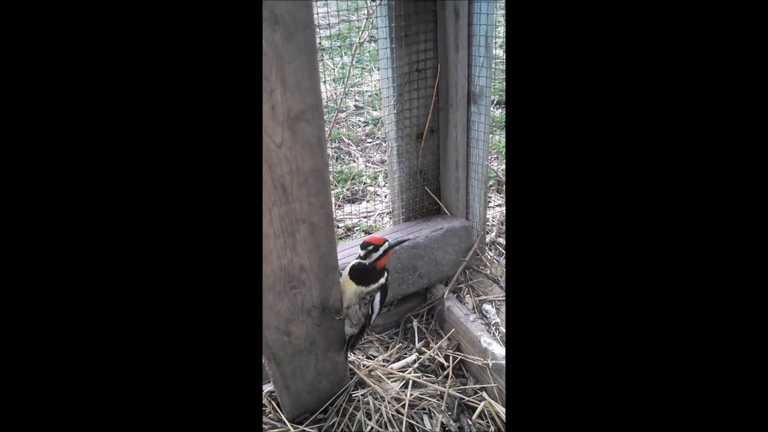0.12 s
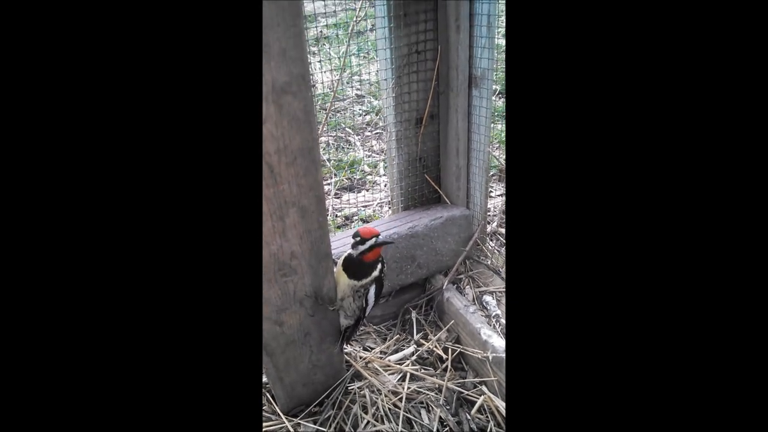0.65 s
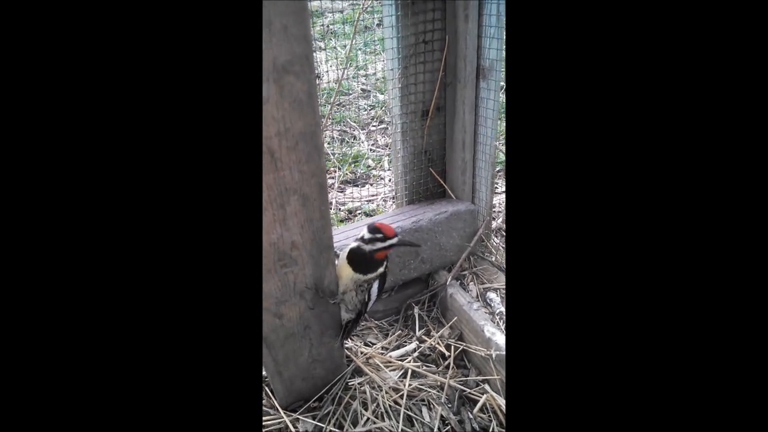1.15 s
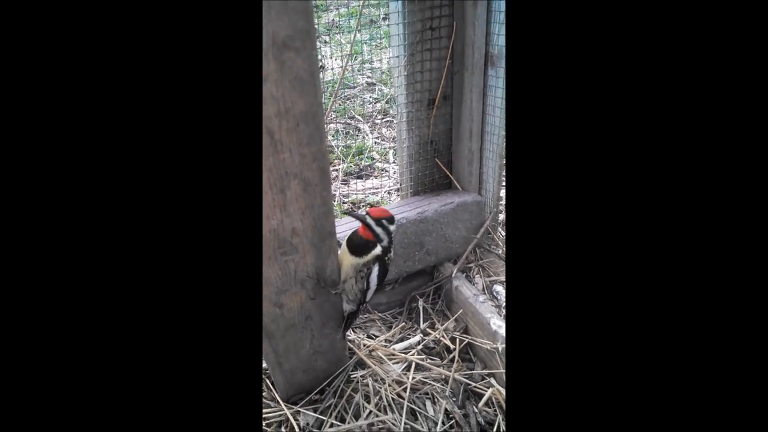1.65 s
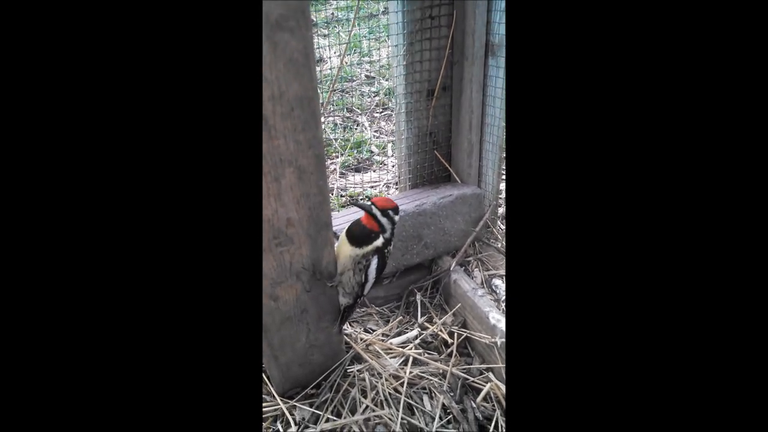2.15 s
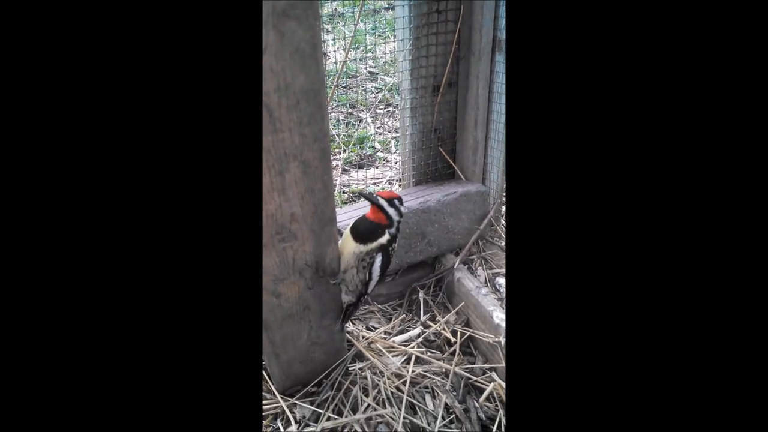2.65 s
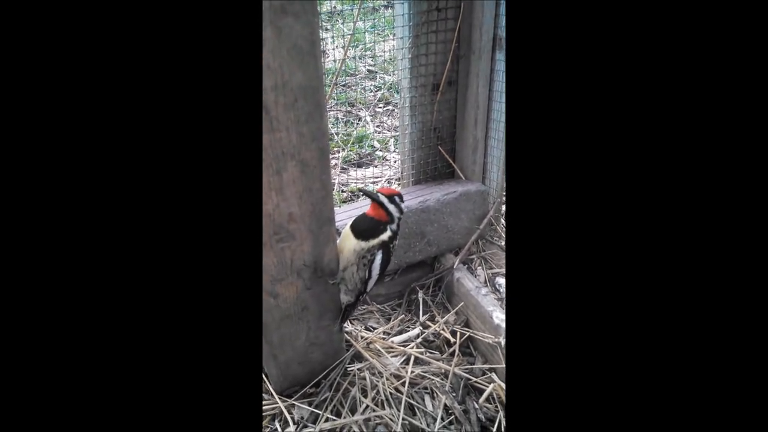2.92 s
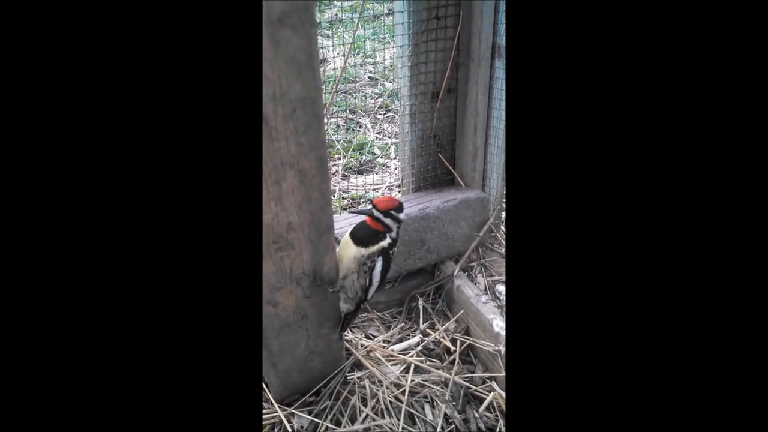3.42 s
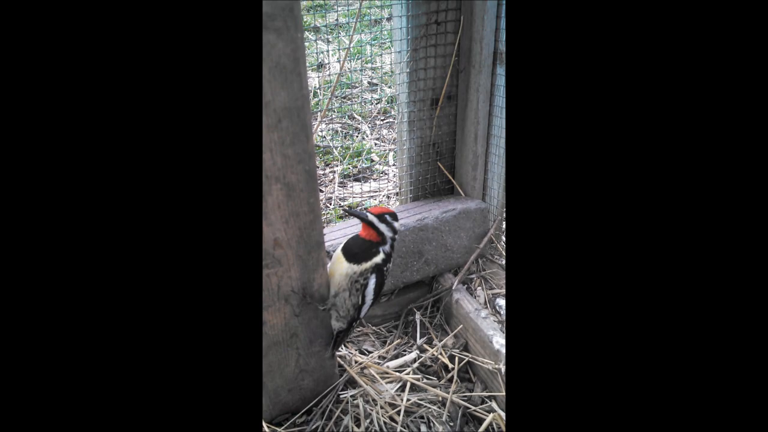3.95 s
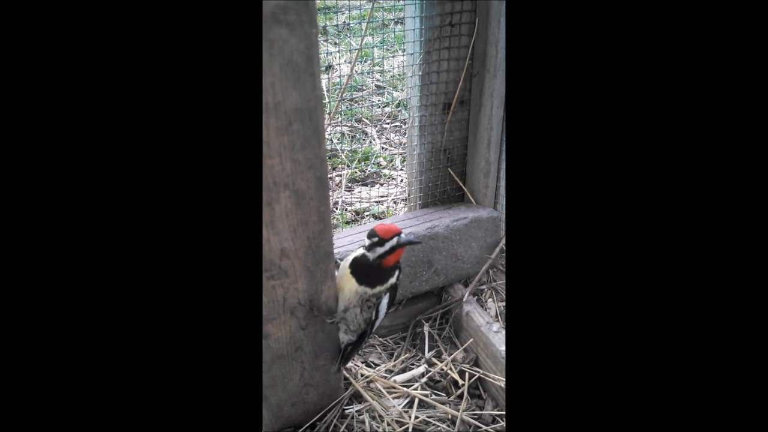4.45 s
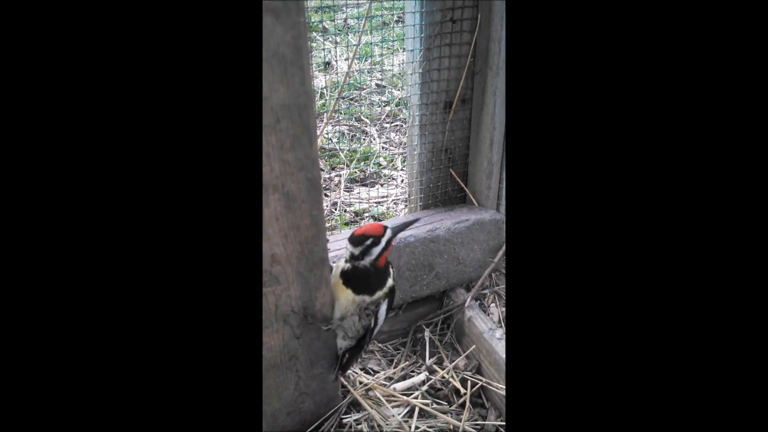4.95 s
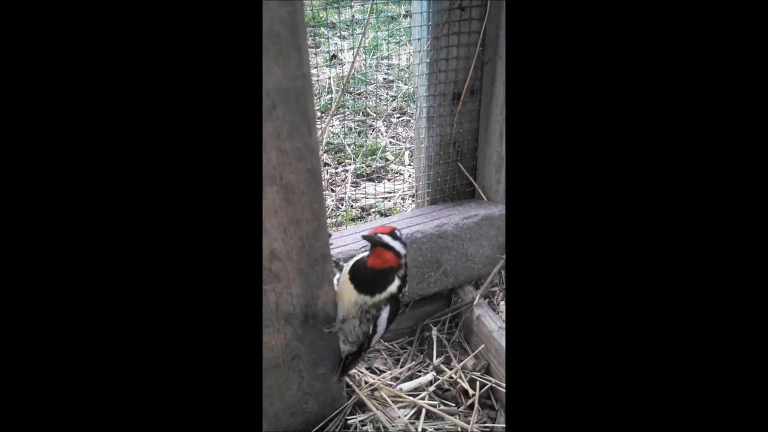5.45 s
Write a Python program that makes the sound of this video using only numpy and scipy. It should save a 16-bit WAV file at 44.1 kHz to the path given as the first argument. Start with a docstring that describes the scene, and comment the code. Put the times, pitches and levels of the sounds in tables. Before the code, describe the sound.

A woodpecker-like caller, at some distance, gives five brief, raspy mews of about a fifth of a second, nasal and two-voiced with echoing tails. Between the second and third, a small bird on the right buzzes, then trills sharply for over a second. Small straw snaps sit close by. Underneath, steady airy rumble, thin hiss and a wavering low motor hum fill the wide stereo outdoor background.

```python
"""A quiet aviary heard at a pair of microphone ports: outdoor wash, hiss and a far engine's wavering drone throughout.
Straw rustles and ticks near by; from the start an unseen animal some way off gives five hoarse two-voiced calls,
each a stack of sine lines and breath noise that rings on among the buildings as decaying noise echoes.
After the second call a songbird buzzes in beating tones, then trills in gliding whistles through the third
and fourth calls. The ports are delayed and subtracted crosswise to make left and right."""
import sys
import numpy as np
from scipy import signal
from scipy.fft import rfft, irfft, next_fast_len
from scipy.io import wavfile
from scipy.ndimage import uniform_filter1d, map_coordinates

SR = 44100
rng = np.random.default_rng(int(sys.argv[2]) if len(sys.argv) > 2 else 0)


def wav_out(sig):
    """Save sig, one row per channel (or a flat mono array), as 16-bit PCM at SR to the path in sys.argv[1]."""
    wavfile.write(sys.argv[1], SR, np.round(np.clip(np.atleast_2d(sig).T, -1, 1) * 32767).astype(np.int16))


def voltage_ratio(level):
    """Linear amplitude factor for a level in decibels (scalar or array-like)."""
    return 10 ** (np.asarray(level, float) / 20)


N = 246519  # samples

# Levels are relative: each layer is trimmed further where it is mixed.
# outdoor wash from all around: pitch_hz, density_db (per Hz)
WASH_SPECTRUM = [(25, -27.5), (60, -1.5), (95, 0.5), (160, -1), (300, -9.5), (600, -18), (1100, -19.5),
                 (2000, -20.5), (2700, -23.5), (4500, -29.5), (7000, -32), (9000, -73)]
# hiss: pitch_hz, density_db (per Hz)
HISS_SPECTRUM = [(1500, -54), (3500, -15), (6800, -17), (7600, 3), (10000, 3.5), (14800, -1), (15400, -16)]
# far wash that reaches the right port first: pitch_hz, density_db (per Hz)
ROAD_SPECTRUM = [(150, -31), (350, -5.5), (700, -2.5), (1200, -5), (2100, -8), (2800, -12), (4000, -71)]
# port difference relative to port sum in the diffuse sound: pitch_hz, level_db
PORT_DIFFERENCE = [(30, 8), (75, -20), (170, -11.5), (350, -5), (700, -2.5), (1400, -0.65)]
# lean of the diffuse sound to the left: pitch_hz, share (-1 to 1)
LEFT_LEAN = [(60, 0.048), (200, 0.32), (400, 0.12), (8000, -0.07)]
# far engine's drone: time_s, pitch_hz, level_db
ENGINE_DRONE = [(0, 87.8, -52), (.47, 87.4, -46), (.87, 89.96, -53), (1.5, 89, -49.5), (2.15, 90.66, -56),
                (3.75, 91.57, -45), (5.59, 92.3, -48.5)]
# recorder's own steady tones: pitch_hz, level_db
RECORDER_TONES = [(10083, -83), (12500, -84), (14998, -78.5)]
# straw shifting: start_s, level_db, length_s
STRAW_RUSTLES = [(0.021, -50, 0.049), (2.08, -81, 0.11), (2.419, -57.5, 0.069), (5.514, -49, 0.06)]
# straw ticks: start_s, treble_level_db, lower_burst_db (relative to treble)
STRAW_TICKS = [(0.393, -44, -13), (0.8056, -47.5, 11), (0.813, -56, 7.5), (0.821, -55, 8.5),
               (0.825, -56, 5), (2.0874, -39, -30), (2.143, -35.5, -25), (2.2055, -51, -17),
               (3.1227, -32.5, -12.5), (4.348, -33.5, -24), (4.7652, -44, -20), (4.9737, -48, -18),
               (5.1723, -38.5, -12.5), (5.234, -33.5, -18)]
# calls: start_s, length_s, upper_swell_db (onset to peak), lower_tremble_db, lower_peak_at (share of length)
CALL_TIMING = [(.025, .21, 13, 2, 0.24), (.945, .2, 13, 2.5, .3), (2.99, 0.25, 24, 3, 0.52),
               (3.874, .24, 22, 5.5, 0.29), (5.124, .22, 33.5, 4.5, .4)]
# upper voice of each call: peak_db, opening_hz, highest_hz, closing_hz, fundamental_db (relative)
UPPER_VOICE = [(-32, 560, 600, 591, -8.5), (-30, 555, 600, 588, -14), (-37.5, 545, 585, 563, -11.5),
               (-29.5, 510, 605, 591, -14.5), (-32, 520, 585, 572, -11)]
# lower voice of each call: peak_db, opening_hz, held_hz, every_second_cycle_db, every_third_cycle_db
LOWER_VOICE = [(-37, 410, 423, 15, -15), (-38, 420, 423, 15.5, -6), (-36.5, 384, 431, -2.5, -1),
               (-41, 390, 430, -1, 0), (-42, 340, 430, 3, -1.5)]
# throat resonance: pitch_hz, gain_db
THROAT_GAIN = [(200, -34), (430, -7.5), (640, -9.5), (860, -5.5), (1120, 4), (1300, -5), (1500, -17.5),
               (1780, -14), (2350, -20.5), (3000, -23.5), (3600, -17), (4200, -23), (4750, -20),
               (7100, -38), (9000, -35.5), (12000, -38.5)]
# phase lead of the left port as the call bends round the pen: pitch_hz, lead_rad
PEN_BEND = [(430, 1), (590, 0.44), (855, 0), (1050, -2), (1175, -2.5), (1770, -2.5), (3560, -4.5),
            (4750, -4.5)]
# yard's ringing before scaling: pitch_hz, t60_s
YARD_DECAY = [(400, 0.23), (1200, 0.88), (4000, 0.61), (9000, 0.91)]

WASH_DB, HISS_DB = -54.5, -62
TICK_MS = 1.25  # time for a tick to fall to 1/e
# upper voice: shares of the call's length; dB lost while held and while closing
UPPER_PEAK, UPPER_HOLD, UPPER_SAG_DB, CLOSE_DB = 0.62, 0.83, 5, 13.5
# shares: upper voice tops out, then sags; lower voice settles
HIGHEST_AT, SAG_SPAN, HELD_AT = 0.43, 0.238, 0.33
LOWER_RISE_DB, LOWER_FALL_DB = 14.5, 25.5  # lower voice under its peak at start and end
MID_DB, MID_AT, MID_WIDTH = 10, 0.522, 0.082  # upper fundamental fills out mid-call (shares)
SPLIT_DB, SPLIT_AT, SPLIT_WIDTH = 12.5, 0.49, 0.17  # lower cycles alternate most mid-call (shares)
BREATH_DB = -8  # relative to the voices
HOARSE_TURNS, CLEARS_AT = 0.065, 0.58  # onset phase scatter at 1 kHz; share at which the voice clears
MOUTH_DB, MOUTH_S = 9, 0.026  # onset treble loss per octave above 500 Hz; its decay time
PIP_DB, PIP_S, LOW_PIP_DB, LOW_PIP_S, PIP_WIDTH_S = -41, 0.011, -44, 0.028, 0.012
ECHO_LAG = 12  # samples by which the left tail trails its share of the right
BUZZ_S, BUZZ_LENGTH_S, BUZZ_ATTACK_S = 2.606, 0.174, 0.017
BUZZ_DB, BUZZ_FADE_DB, BUZZ_FROM_HZ, BUZZ_TO_HZ = -51.5, 12.5, 3910, 4080
# first syllable, spacing, and lag that grows with the square of the count
SYLLABLES, TRILL_S, TRILL_GAP_S, TRILL_SLOWS_S = 14, 2.7935, 0.095, 0.00021
TRILL_DB, TRILL_SHY_DB, TRILL_LAST_DB = -34.5, 4, -3  # base, shortfall of the first, change for the last
RISE_DB, RISE_GROWS_DB = -14.5, 0.2  # rising note relative to the base; gain per syllable
CROSS_LAG = 16  # samples between crossed ports
TOP_HZ = 15800


def unit(x):
    """Scales to an rms of 1."""
    return x / np.sqrt(np.mean(x ** 2) + 1e-20)


def along(points, hz):
    """Interpolates (Hz, value) points on a log frequency axis."""
    f, v = np.transpose(points)
    return np.interp(np.log(hz + 1), np.log(f + 1), v)


def bump(u, at, width):
    """A bell of height 1."""
    return np.exp(-((u - at) / width) ** 2)


def wobble(rate, size):
    """A smooth random curve with rate knots a second."""
    return map_coordinates(rng.standard_normal(int(size * rate / SR) + 4), [np.arange(size) * rate / SR])


def filtered(x, response):
    """Multiplies the spectrum of x by a complex response of frequency."""
    m = next_fast_len(x.shape[-1] + 8192)
    return irfft(rfft(x, m) * response(np.fft.rfftfreq(m, 1 / SR)), m)[..., :x.shape[-1]]


def add(track, s, sound):
    """Mixes a sound in at a time in seconds."""
    part = track[max(round(s * SR), 0):][:len(sound)]
    part += sound[:len(part)]


def at_ports(x, lead_ms, left_db):
    """Places a source by the left port's lead in time and its level over the right."""
    side = np.array([[0.5], [-0.5]])
    return filtered(x, lambda hz: voltage_ratio(left_db * side) * np.exp(2j * np.pi * hz * side * lead_ms / 1000))


def field(spectrum, patchy_db):
    """Diffuse noise whose likeness at the two ports varies with frequency, with patches of random gain."""
    z = signal.stft(rng.standard_normal((2, N)), nperseg=512)[2]
    patches = uniform_filter1d(rng.standard_normal(z.shape[1:]), 6, 0)
    patches = uniform_filter1d(patches, 12, 1)
    a, b = signal.istft(z * voltage_ratio(patchy_db * unit(patches)), nperseg=512)[1][:, :N]

    def lean(hz):
        return np.clip(along(LEFT_LEAN, hz), -0.9, 0.9)

    def apart(hz):
        return voltage_ratio(along(spectrum, hz) + along(PORT_DIFFERENCE, hz))

    both = filtered(a, lambda hz: voltage_ratio(along(spectrum, hz)))
    # the quarter-turned part follows the sum and so gives direction; the rest is independent
    diff = filtered(a, lambda hz: 1j * lean(hz) * apart(hz))
    diff += filtered(b, lambda hz: np.sqrt(1 - lean(hz) ** 2) * apart(hz))
    return unit(np.array([both + diff, both - diff]))


def outdoor_wash():
    """Diffuse wash and hiss around the ports, with a far wash given a direction, all shaped noise."""
    low_db = WASH_DB + 2.1 * wobble(2.41, size=N)
    hiss_db = HISS_DB + 0.16 * wobble(2.56, size=N)
    wash = voltage_ratio(low_db + 5.5) * field(WASH_SPECTRUM, patchy_db=1.5)
    hiss = voltage_ratio(hiss_db + 2.0) * field(HISS_SPECTRUM, patchy_db=1.0)
    road = unit(filtered(rng.standard_normal(N), lambda f: voltage_ratio(along(ROAD_SPECTRUM, f))))
    return wash + hiss + at_ports(voltage_ratio(low_db - 4.0) * road, lead_ms=-0.29, left_db=1.0)


def engine_drone():
    """A far engine's drone: one low sine whose pitch and level waver."""
    time_s, pitch_hz, level_db = np.transpose(ENGINE_DRONE)
    t = np.arange(N) / SR
    db = np.interp(t, time_s, level_db) + 3.5 + 2.2 * wobble(12, size=N)
    hz = np.interp(t, time_s, pitch_hz) * (1 + 0.0151 * wobble(9, size=N))
    drone = voltage_ratio(db) * np.sin(2 * np.pi * np.cumsum(hz) / SR)
    return at_ports(drone, lead_ms=0.22, left_db=1.0)


def recorder_tones():
    """The recorder's own thin tones: sines of fixed pitch and slightly unsteady level."""
    t = np.arange(N) / SR
    tones = np.zeros(N)
    for hz, level_db in RECORDER_TONES:
        tones += voltage_ratio(level_db + 7.5 + 0.73 * wobble(33, size=N)) * np.sin(2 * np.pi * hz * t)
    return at_ports(tones, lead_ms=0.018, left_db=-15.0)


def straw():
    """Dry stalks snap in a bright and a lower burst that die within milliseconds; shifting straw crackles softly."""
    high, low, t = np.zeros(N), np.zeros(N), np.arange(SR // 20) / SR
    for start_s, db, low_db in STRAW_TICKS:
        burst = np.exp(-1000 * t / TICK_MS) * rng.standard_normal((2, len(t)))
        add(high, start_s, voltage_ratio(db - 4.5) * burst[0])
        add(low, start_s, voltage_ratio(db + low_db + 10.5) * burst[1])
    for start_s, db, length_s in STRAW_RUSTLES:
        size = round(length_s * SR)
        swell = voltage_ratio(db + 3.5 * wobble(318, size=size)) * np.hanning(size) ** 0.33
        crackle = swell * rng.standard_normal((2, size))
        add(high, start_s, 0.47 * crackle[0])
        add(low, start_s, crackle[1])
    high = signal.sosfilt(signal.butter(2, 8200, "high", fs=SR, output="sos"), high)
    low = signal.sosfilt(signal.butter(2, (2500, 7800), "band", fs=SR, output="sos"), low)
    return at_ports(high + low, lead_ms=-0.039, left_db=-16.5)


def echoes(x, t60_scale, early_db):
    """Near walls and the yard's diffuse decay: different at each port, new for each half second of sound."""
    out = np.zeros((2, N + 2 * SR))
    for start in range(0, N, SR // 2):
        stretch = x[None, start:start + SR // 2]
        if not stretch.any():
            continue
        hz, t, z = signal.stft(rng.standard_normal((2, SR)), SR, nperseg=256)
        t60 = t60_scale * along(YARD_DECAY, hz)[:, None]
        tail = signal.istft(z * voltage_ratio(-60 * t / t60), SR, nperseg=256)[1]
        # a smaller share of the echoes comes from the right and reaches the left port late
        tail[0] = 1.55 * tail[0] + 0.61 * np.roll(tail[1], shift=ECHO_LAG)
        tail = np.pad(tail / np.linalg.norm(tail[0]), ((0, 0), (600, 0)))
        # eight single reflections at each port
        tail[[[0], [1]], rng.integers(40, 1100, size=(2, 8))] += voltage_ratio(early_db) * rng.standard_normal((2, 8))
        wet = signal.fftconvolve(stretch, tail, axes=1)
        out[:, start:][:, :wet.shape[1]] += wet
    return out[:, :N]


def partial(hz, turns, db, rough_db):
    """One voice line through the throat: effort brightens it, height roughens it, its onset is hoarse and muffled."""
    size = len(hz)
    height = np.maximum(np.log2(hz / 1400), 0)  # octaves
    u = np.linspace(0, 1, size)
    tremble = rough_db * (1 + 0.41 * height) * wobble(44.8, size=size)
    hoarse = HOARSE_TURNS * np.clip(1 - (u / CLEARS_AT) ** 2, 0, 1) * np.minimum(hz / 1000, 1.5)
    blur = (0.065 * height + hoarse) * wobble(159.6, size=size)
    muffle = MOUTH_DB * np.exp(-np.arange(size) / SR / MOUTH_S) * np.log2(hz / 500)
    effort = 0.41 * (db + 26.0) * height
    level = voltage_ratio(db + along(THROAT_GAIN, hz) + effort + tremble - muffle)
    return level * np.sin(2 * np.pi * (turns + blur + rng.random()))


def upper_membrane(u, swell_db, upper):
    """The steady membrane: a full harmonic series; returns its voice, level and phase in turns."""
    peak_db, open_hz, top_hz, close_hz, hollow_db = upper
    loss = [swell_db, 0, UPPER_SAG_DB, UPPER_SAG_DB + CLOSE_DB]
    db = peak_db - np.interp(u, [0, UPPER_PEAK, UPPER_HOLD, 1], loss)
    first_db = hollow_db + MID_DB * bump(u, MID_AT, MID_WIDTH)
    sag_hz = (top_hz + 2 * close_hz) / 3
    hz = np.interp(u, [0, HIGHEST_AT, HIGHEST_AT + SAG_SPAN, 1], [open_hz, top_hz, sag_hz, close_hz])
    hz = hz * (1 + 0.00706 * wobble(60.9, size=len(u)))
    turns = np.cumsum(hz) / SR
    voice = partial(hz, turns, db + first_db + 10.0, rough_db=4.5)
    voice += sum(partial(k * hz, k * turns, db + 4.5, rough_db=3.0) for k in range(2, 22))
    return voice, db, turns


def lower_membrane(u, rough_db, low_peak, lower):
    """Cycles alternate in twos or threes, adding lines at halves and thirds of the pitch; returns like the upper."""
    peak_db, open_hz, held_hz, second_db, third_db = lower
    db = peak_db - np.interp(u, [0, low_peak, 1], [LOWER_RISE_DB, 0, LOWER_FALL_DB])
    split_db = db + SPLIT_DB * (bump(u, SPLIT_AT, SPLIT_WIDTH) - 1)
    # a sixth of the pitch holds both the halves and the thirds
    sixth = np.interp(u, [0, HELD_AT], [open_hz, held_hz]) / 6
    sixth = sixth * (1 + 0.0029 * rough_db * wobble(63.1, size=len(u)))
    turns = np.cumsum(sixth) / SR
    voice = np.zeros(len(u))
    for k in range(3, 66):
        if k % 6 == 0:
            line_db = db + 5.5
        elif k % 3 == 0:
            line_db = split_db + second_db
        elif k % 2 == 0:
            line_db = split_db + third_db
        else:
            continue
        voice += partial(k * sixth, k * turns, line_db, rough_db)
    return voice, db, 6 * turns


def breath(size):
    """Air escapes through the throat in uneven puffs of noise."""
    def throat(f):
        return voltage_ratio(along(THROAT_GAIN, f) + 2.7 * np.log2(1 + f / 1500))

    air = unit(filtered(rng.standard_normal(size), throat))
    return air * voltage_ratio(4.5 * wobble(221.0, size=size))


def call(timing, upper, lower):
    """Two membranes sound together with breath, each opening with a short pure pip."""
    length_s, swell_db, rough_db, low_peak = timing[1:]
    t = np.arange(0, length_s, 1 / SR)
    u = t / length_s
    high_voice, db, turns = upper_membrane(u, swell_db, upper)
    low_voice, low_db, low_turns = lower_membrane(u, rough_db, low_peak, lower)
    pips = voltage_ratio(PIP_DB) * bump(t, PIP_S, PIP_WIDTH_S) * np.sin(2 * np.pi * turns)
    pips += voltage_ratio(LOW_PIP_DB) * bump(t, LOW_PIP_S, PIP_WIDTH_S) * np.sin(2 * np.pi * low_turns)
    air = breath(len(t)) * voltage_ratio(BREATH_DB) * (voltage_ratio(db) + voltage_ratio(low_db))
    edges = np.clip(np.minimum(t / 0.0072, (length_s - t) / 0.031), 0, 1)
    return (high_voice + low_voice + pips + air) * edges


def caller():
    """The five distant calls, heard straight with a phase bend between the ports, and through the yard."""
    dry = np.zeros(N)
    for timing, upper, lower in zip(CALL_TIMING, UPPER_VOICE, LOWER_VOICE):
        add(dry, timing[0], call(timing, upper, lower))
    side = np.array([[0.5], [-0.5]])
    direct = filtered(dry, lambda hz: np.exp(1j * side * along(PEN_BEND, hz)))
    return voltage_ratio(-2.0) * direct + voltage_ratio(-5.0) * echoes(dry, t60_scale=1.05, early_db=-5.5)


def buzz():
    """Three wavering tones, out of harmonic step, beat at about 130 Hz and fade."""
    t = np.arange(0, BUZZ_LENGTH_S, 1 / SR)
    size, u = len(t), t / BUZZ_LENGTH_S
    hz = BUZZ_FROM_HZ + (BUZZ_TO_HZ - BUZZ_FROM_HZ) * u
    beats = np.cumsum(130 * (1 + 0.22 * wobble(68.6, size=size))) / SR
    turns = np.cumsum(hz) / SR + 0.22 * wobble(700, size=size)
    tone = np.sin(2 * np.pi * turns) + 0.33 * np.sin(2 * np.pi * 0.82 * turns)
    tone += 0.77 * np.sin(2 * np.pi * (0.59 * turns + 0.23 * wobble(297, size=size)))
    level = voltage_ratio(BUZZ_DB - BUZZ_FADE_DB * u + 4 + 2.6 * wobble(260, size=size))
    return np.minimum(t / BUZZ_ATTACK_S, 1) * level * (1 + 0.28 * np.sin(2 * np.pi * beats)) * tone


def note(from_hz, to_hz, length, peak, bend):
    """A gliding whistle that swells to its peak (share of its length) and fades."""
    u = np.arange(round(length * SR)) / (length * SR)
    hz = to_hz + (from_hz - to_hz) * (1 - u) ** bend
    swell = np.sin(np.pi / 2 * np.where(u < peak, u / peak, (1 - u) / (1 - peak))) ** 0.8
    return swell * voltage_ratio(2.8 * wobble(346, size=len(u))) * np.sin(2 * np.pi * np.cumsum(hz) / SR)


def songbird():
    """A rough buzz, then a trill of upward flicks, quick falls and slower rises; falls and rises sink in pitch."""
    song = np.zeros(N)
    add(song, BUZZ_S, buzz())
    for k in range(SYLLABLES):
        s = TRILL_S + TRILL_GAP_S * k + TRILL_SLOWS_S * k ** 2
        last = k == SYLLABLES - 1
        db = TRILL_DB - TRILL_SHY_DB / (1 + k ** 2) + TRILL_LAST_DB * last + rng.normal(0, 0.9)
        sink = 1 - 0.02735 * (s - 2.8)
        flick = note(3500, 5500, length=0.007, peak=0.6, bend=0.9)
        fall = note(5100 * sink, 3900 * sink, length=0.0193, peak=0.14, bend=1.475)
        add(song, s - 0.006, voltage_ratio(db - 13) * flick)
        add(song, s - 0.0005, voltage_ratio(db - 9.5) * fall)
        if not last:
            rise = note(4300 * sink, 4750 * sink ** 2, length=0.03414, peak=0.54, bend=0.764)
            add(song, s + 0.044, voltage_ratio(db + RISE_DB + RISE_GROWS_DB * k) * rise)
    direct = at_ports(song, lead_ms=-0.077, left_db=-16.5)
    return direct + voltage_ratio(-4) * echoes(song, t60_scale=1.0, early_db=-8.5)


def scene():
    """Everything that arrives at the two ports."""
    return outdoor_wash() + engine_drone() + recorder_tones() + straw() + caller() + songbird()


def band_limit(x):
    """A steep low-pass at the top of the band."""
    return signal.sosfilt(signal.butter(12, 16410, fs=SR, output="sos"), x)


def record(dry):
    """Each side is its port minus the other port delayed; a bass lift makes up what the subtraction takes."""
    late = np.pad(dry[::-1], ((0, 0), (CROSS_LAG, 0)))[:, :N]

    def lift(hz):
        return (1j * hz + 620) / (1j * hz + 40) / np.sqrt(2) * (hz < TOP_HZ)

    mix = filtered(dry - late, lift)
    return band_limit(mix)


dry = scene()
out = record(dry)
wav_out(out)
```